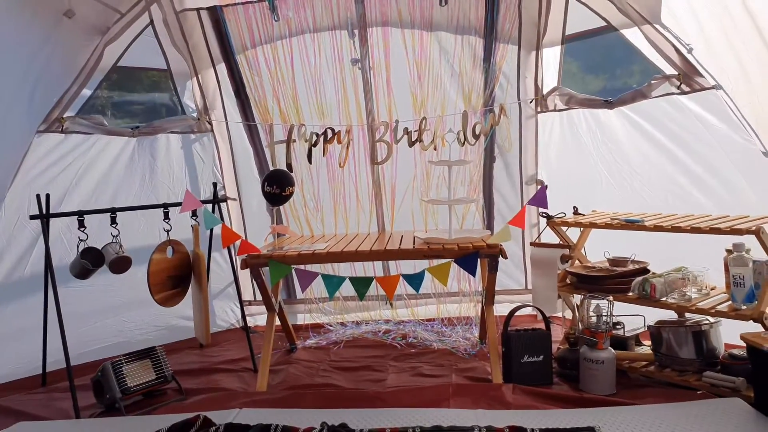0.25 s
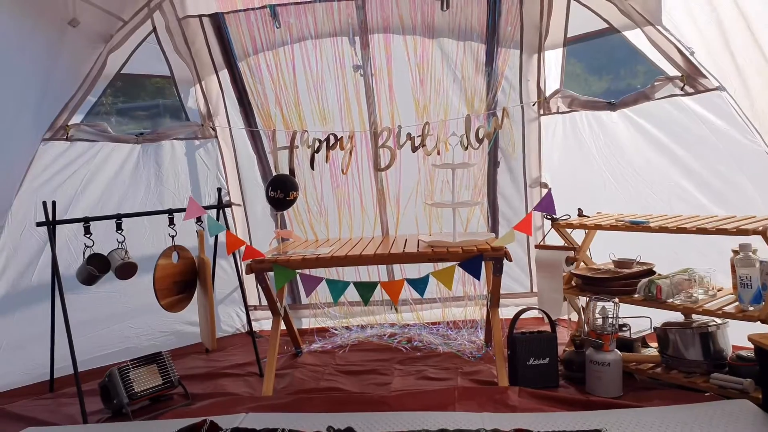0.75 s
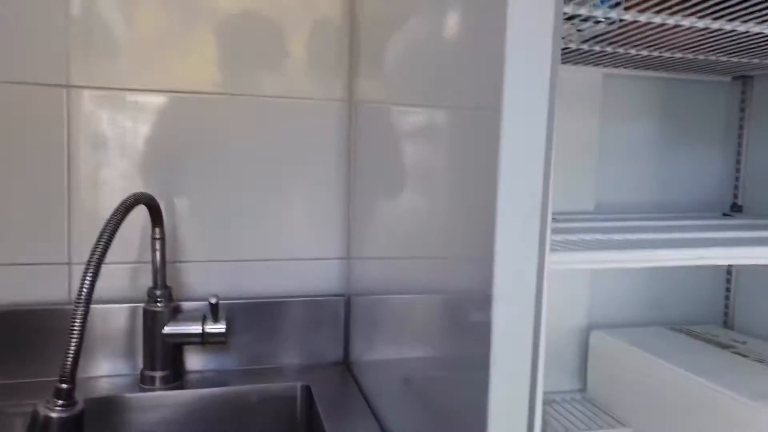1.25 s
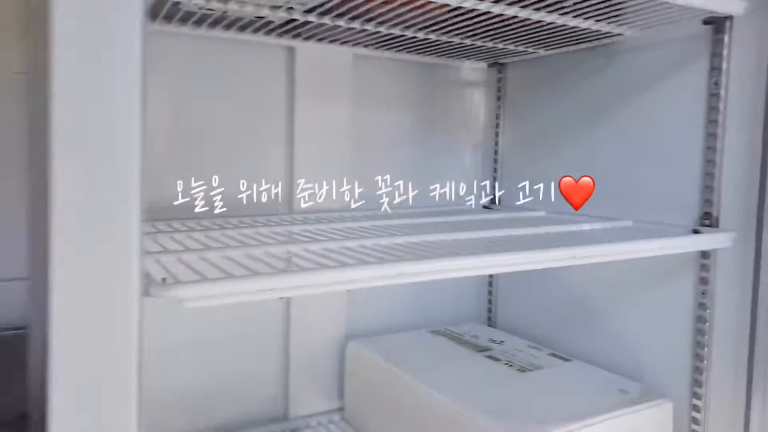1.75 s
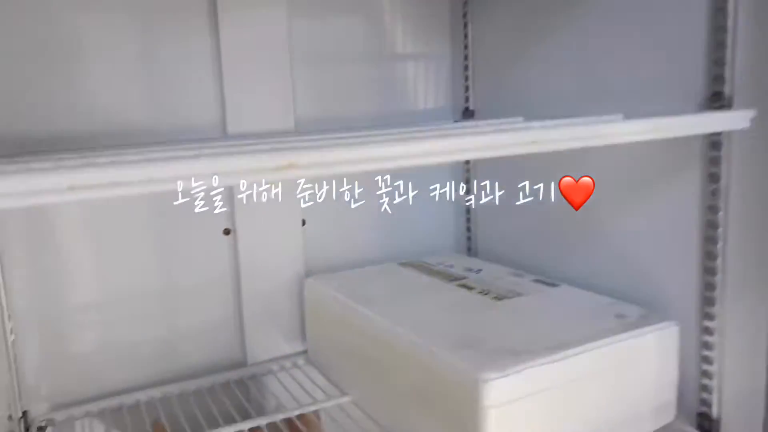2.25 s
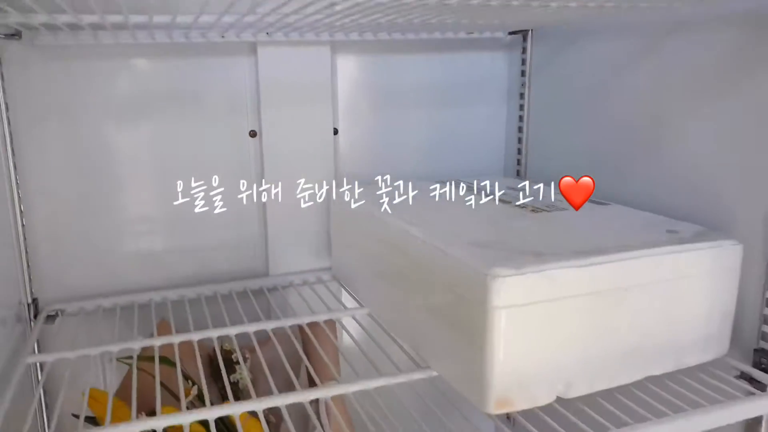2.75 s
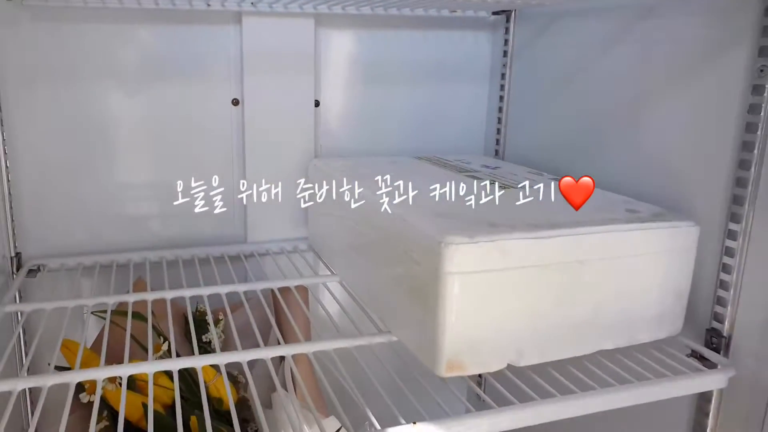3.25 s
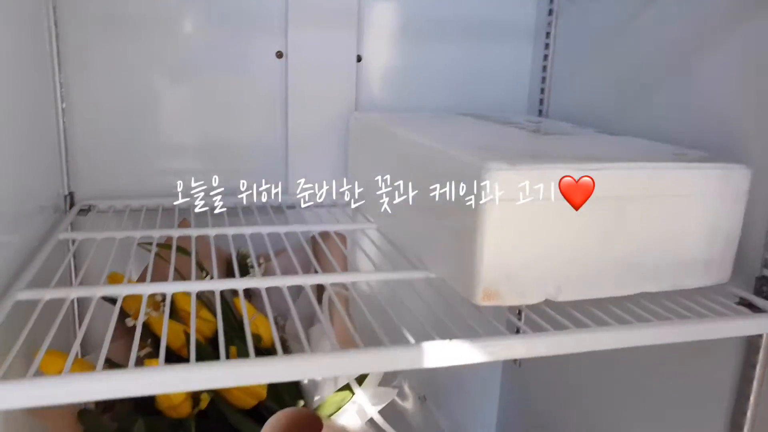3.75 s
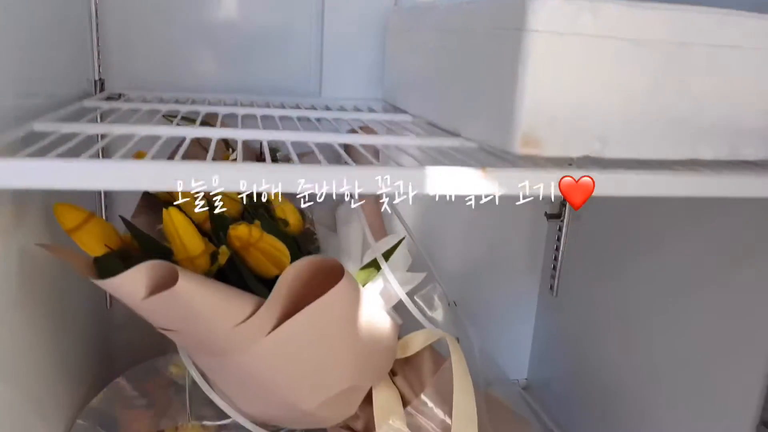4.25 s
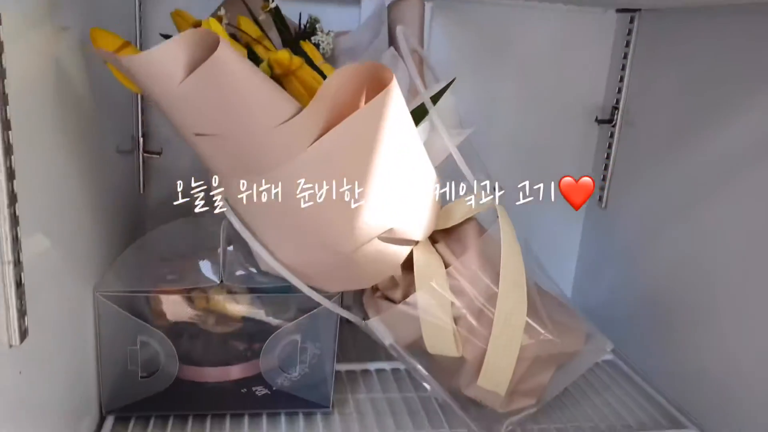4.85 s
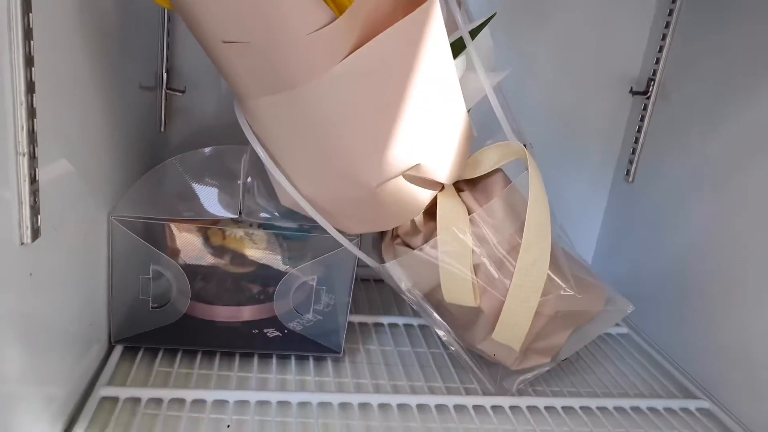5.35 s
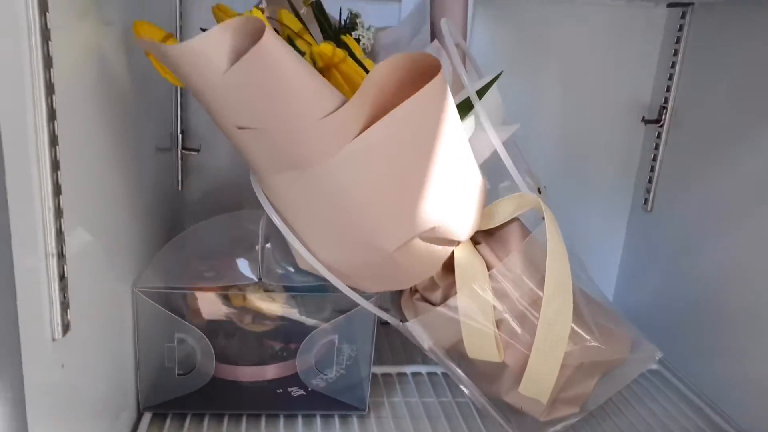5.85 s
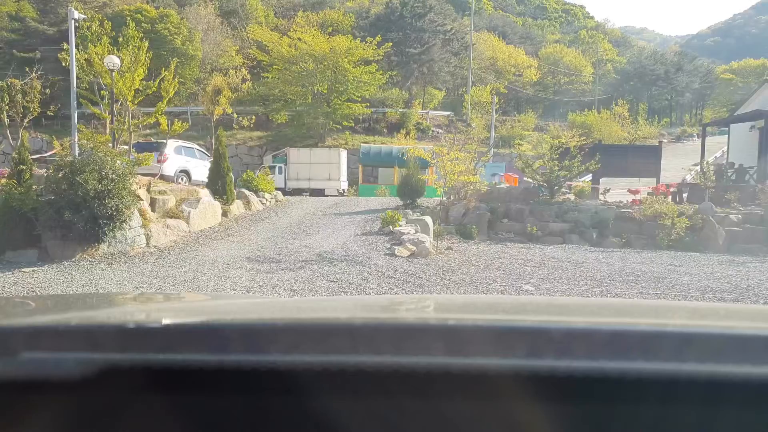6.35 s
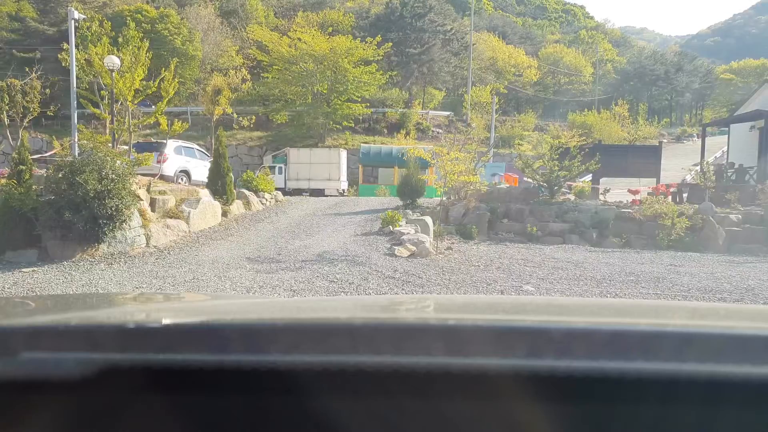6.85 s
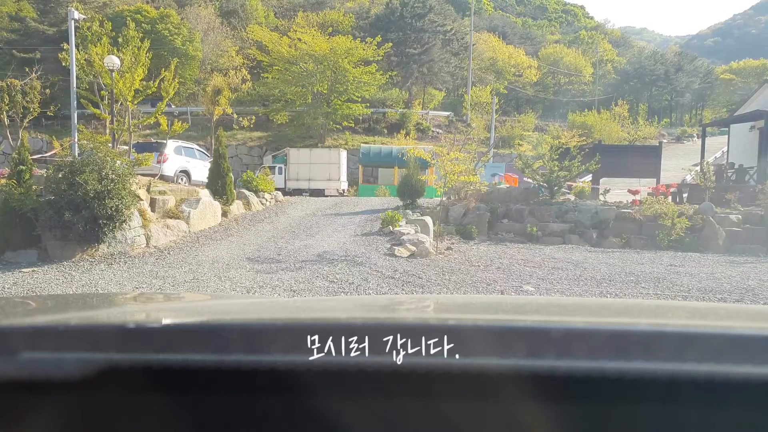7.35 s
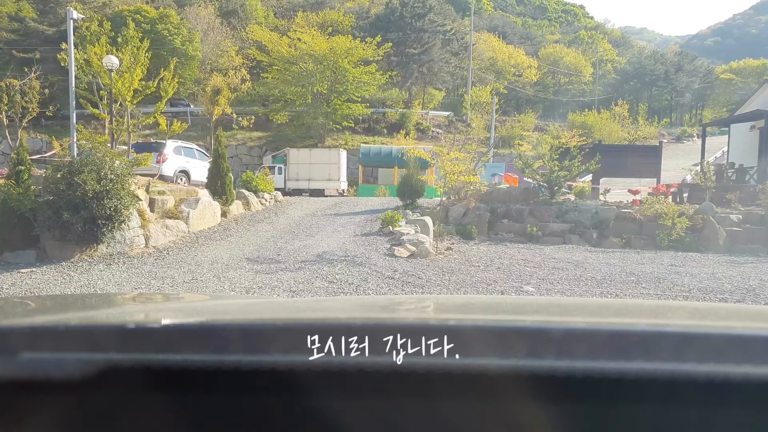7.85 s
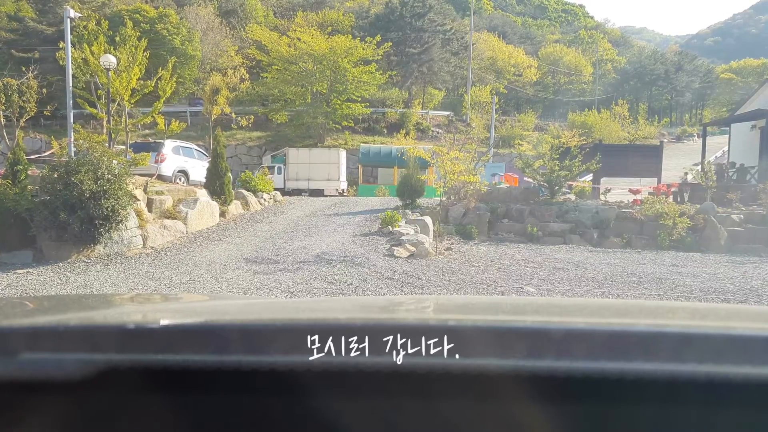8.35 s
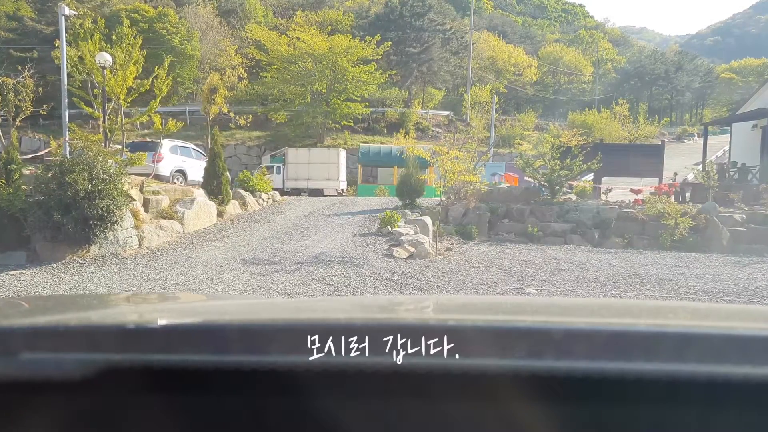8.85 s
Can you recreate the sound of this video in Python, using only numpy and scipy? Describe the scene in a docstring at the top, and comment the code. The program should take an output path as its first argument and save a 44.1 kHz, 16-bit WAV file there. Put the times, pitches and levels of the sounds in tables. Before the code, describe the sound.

From 0 to 1 s, a very quiet tent: faint outdoor air, tiny papery rustles and soft low cloth flaps on the left. At 1.0 s it cuts abruptly to an open commercial refrigerator, growing quickly louder over half a second as the microphone nears, with a brief hollow airy note. Low motor hum beats slowly under fluttering fan tones, booming roar, duct rush and grille hiss; colours shift with movement. Light ticks come near 1.8 and 3.8 s, a thin squeak at 2.7 s; the roar eases slightly after 3 s. At 5.85 s, a dead, padded car cabin: dull double knocks, another heavy cluster at 6.2 s, over low idle and soft clatter. Light taps from 7 s, a sharp latch click at 7.5 s, then the engine revs, peaking around 8.2-8.5 s with taps, and settles by 8.9 s with a low jolt at 8.8 s; abrupt end.

```python
"""A quiet tent comes first: faint outdoor air as shaped noise, with rustles and flaps of the cloth.
Then an open commercial refrigerator: wavering tones hum and beat for its motors and fans,
and noise roars, rushes and hisses through the steel cabinet, with booming standing waves.
Last a car cabin: crank-locked tones and clatter idle, swell and settle; controls thud and click."""
import sys
import numpy as np
from scipy import signal
from scipy.fft import rfft, irfft, next_fast_len
from scipy.io import wavfile
from scipy.ndimage import uniform_filter1d, map_coordinates

SR = 44100
rng = np.random.default_rng(int(sys.argv[2]) if len(sys.argv) > 2 else 0)


def transcribe(u):
    """Save the signal u as a 16-bit wav file named by the first command-line argument.

    u: samples, shape (n,) or (channels, n), limited to [-1, 1]; the rate is SR.
    q: integer samples, one column per channel.
    """
    v = np.clip(np.atleast_2d(u).T, -1, 1)
    q = np.round(v * 32767).astype(np.int16)
    wavfile.write(sys.argv[1], SR, q)


N = 400869
T = np.arange(N) / SR   # seconds

FRIDGE_FROM_S, CAR_FROM_S = 1.024, 5.851


def from_db(db):
    """Decibels to gain."""
    return np.exp(np.asarray(db, dtype=np.float32) * np.float32(np.log(10) / 20))


def rms(x):
    """Root mean square."""
    return np.sqrt(np.mean(x ** 2) + 1e-20)


def in_time(rows):
    """Each column of a curve, sample by sample."""
    s, *columns = np.transpose(rows)
    return [np.interp(T, s, column) for column in columns]


def gain_at(points, hz):
    """Gain of a (Hz, dB) table, joined on a log-frequency axis."""
    known_hz, level_db = np.transpose(points)
    return from_db(np.interp(np.log(hz), np.log(known_hz), level_db))


def drift(rate):
    """Smooth random wander of spread about 1, through `rate` random knots per second."""
    knots = rng.standard_normal(1000)
    coarse_s = T[::50]
    wander = map_coordinates(knots, [coarse_s * rate + 2], mode="wrap")
    return np.interp(T, coarse_s, wander)


def turns(hz):
    """Cycles completed at a changing rate."""
    return np.cumsum(hz) / SR


def tone(cycles):
    """A sine of rms 1 that starts anywhere in its cycle."""
    phase = cycles + rng.random()
    wrapped = phase - np.floor(phase)
    return np.sin(np.float32(2 * np.pi * wrapped)) * 2 ** .5


def narrow_noise(hz, width_hz):
    """Noise ringing in one resonance, of rms about 1: two drifts modulate a cosine and a sine."""
    angle = 2 * np.pi * hz * T
    return (drift(width_hz) * np.cos(angle) + drift(width_hz) * np.sin(angle)) / np.sqrt(2)


def white():
    """Two unrelated noises."""
    return rng.standard_normal((2, N), dtype=np.float32)


def coloured(pair, spectrum, width):
    """Shapes a mid and a side signal and gives left and right; mid rms 1."""
    size = next_fast_len(N, True)
    hz = np.maximum(np.fft.rfftfreq(size, 1 / SR), 1)
    (low_hz, low_db), (top_hz, top_db) = spectrum[0], spectrum[-1]
    # beyond both ends the spectrum falls by 80 dB per decade
    closed = [(low_hz / 10, low_db - 80), *spectrum, (top_hz * 10, top_db - 80)]
    bins = rfft(np.float32(pair), size) * gain_at(closed, hz)
    mid = irfft(bins[0], size)[:N]
    side = irfft(bins[1] * gain_at(width, hz), size)[:N]
    return np.array([mid + side, mid - side]) / rms(mid)


def blows(rows):
    """Envelope of contacts that swell to a peak and die away by 60 dB in their decay time."""
    power = np.zeros(N)
    for s, db, swell_s, decay_s in rows:
        near = slice(max(int((s - .5) * SR), 0), int((s + 1) * SR))
        age = T[near] - s
        swell = np.exp(2 * np.minimum(age, 0) / swell_s)
        decay = from_db(db - 60 * np.maximum(age, 0) / decay_s) ** 2
        power[near] += decay * swell
    return np.sqrt(power)


# Still air in the tent. Each row: frequency in Hz, relative density in dB per Hz.
TENT_AIR = [(15, -41), (25, -6.5), (69, -5.5), (188, -12), (281, -12), (399, -19), (640, -22), (850, -20.5),
            (950, -27), (1150, -25), (1380, -30), (1550, -25), (1900, -32), (2300, -42), (4000, -48),
            (7400, -48), (9000, -44), (15500, -44.5)]
# Stereo width of the tent. Each row: frequency in Hz, side against mid in dB.
TENT_WIDTH = [(60, -13), (240, -13), (950, -1.5), (3770, 2.5), (15000, 1)]
# Soft flaps of the cloth. Each row: peak time in seconds, peak in dB before panning,
# swell in seconds, decay in seconds.
FLAPS = [(.068, -51, 0.013, 0.3), (.385, -56, 0.051, 0.23), (.555, -48.5, 0.031, 0.13),
         (.89, -56.5, 0.024, 0.13)]
# Low colour of the flaps. Each row: frequency in Hz, relative density in dB per Hz.
FLAP_TONE = [(25, -14), (55, 3), (75, 4), (110, -10), (160, -13.5), (400, -40), (2000, -70)]
# Small rustles of the cloth. Each row: peak time in seconds, peak in dB, swell and decay in seconds.
RUSTLES = [(.015, -56, .002, .08), (.05, -59, .02, .3), (.178, -59, .012, .2), (.272, -61, .012, .35),
           (.39, -65, .04, .35)]
# Papery colour of the rustles. Each row: frequency in Hz, relative density in dB per Hz.
RUSTLE_TONE = [(500, 0), (1200, 1), (1650, -5), (2050, 1), (2500, -12), (3200, -12), (5000, -23),
               (9000, -18), (15000, -19)]
TENT_DB = -52


def tent(flap_pan_db=18.5):
    """Faint outdoor air; the cloth rustles, and flaps slowly on the left."""
    air = from_db(TENT_DB) * coloured(white(), TENT_AIR, TENT_WIDTH)
    flaps = blows(FLAPS) * coloured(white(), FLAP_TONE, TENT_WIDTH)
    flaps = flaps * from_db([[flap_pan_db], [-flap_pan_db]])
    rustles = blows(RUSTLES) * coloured(white(), RUSTLE_TONE, TENT_WIDTH)
    return air + flaps + rustles


def since_fridge():
    """Seconds since the refrigerator was reached."""
    return np.maximum(T - FRIDGE_FROM_S, 0)


# the microphone closes in on the open cabinet, then sinks away from the fan towards the bottom shelf
APPROACH_DB, APPROACH_S = 16.5, 0.39   # how much quieter it starts, time constant
SINK_FROM_S, SINK_DB_PER_S = 2.93, 1.06


def nearness():
    """Level at the moving microphone, in dB against the cabinet mouth."""
    approach_db = -APPROACH_DB * np.exp(-since_fridge() / APPROACH_S)
    return approach_db - SINK_DB_PER_S * np.maximum(T - SINK_FROM_S, 0)


# hollow note of the gap between cabinet and wall; it sinks as the gap widens
WALL_GAP_HZ, WALL_GAP_SAG_HZ_PER_S, WALL_GAP_DB = 1166, 100, -47
WALL_GAP_PASSED_S, WALL_GAP_FADE_DB_PER_S = 1.39, 70


def wall_gap(width_hz=190):
    """Air noise rings in the narrow gap and dies once the microphone has passed it."""
    db = WALL_GAP_DB - WALL_GAP_FADE_DB_PER_S * np.clip(T - WALL_GAP_PASSED_S, 0, 1)
    cycles = turns(WALL_GAP_HZ - WALL_GAP_SAG_HZ_PER_S * since_fridge())
    ringing = [drift(width_hz) * tone(cycles) + drift(width_hz) * tone(cycles) for _ in "LR"]
    return from_db(db) * np.array(ringing) / np.sqrt(2)


# A wire shelf squeaks once. Each row: peak time in seconds, peak in dB, swell and decay in seconds.
SHELF_SQUEAK = [(2.678, -44, 0.011, 0.13)]
SQUEAK_HZ = 4800


def shelf_squeak(width_hz=130):
    """A wire shelf slips on its bracket with one short, thin squeak of narrow noise."""
    return blows(SHELF_SQUEAK) * np.array([narrow_noise(SQUEAK_HZ, width_hz) for _ in "LR"])


# Steady hum of the compressor and the panels it shakes.
# Each row: frequency in Hz, rms in dB at the cabinet mouth, wander in Hz.
HUM = [(52.6, -48, 0.05), (58.75, -33.5, 0.054), (117.65, -39, 0.083), (209.7, -40.5, 0.69),
       (242.8, -44, 0.13), (1993, -71, 3)]
# the condenser fan beats against twice the mains frequency
CONDENSER_HZ, CONDENSER_DB, CONDENSER_FOLLOWS = 113.5, -33, 1.1   # share of nearness followed
# the buzz grows on the way down to the motors
MAINS_BUZZ_HZ, MAINS_DB, MAINS_GROWTH_DB_PER_S = 120, -43.5, 1.43   # starting level


def fridge_hum(nearness_db, follow=0.43, wander_hz=0.21):
    """Motors slip a little behind the mains, so their lines beat slowly."""
    lines = sum(from_db(db) * tone(turns(hz + wander * drift(1.257))) for hz, db, wander in HUM)
    condenser_hz = CONDENSER_HZ + wander_hz * drift(0.96)
    condenser = from_db(CONDENSER_DB + CONDENSER_FOLLOWS * nearness_db) * tone(turns(condenser_hz))
    mains_db = MAINS_DB + MAINS_GROWTH_DB_PER_S * since_fridge()
    mains = from_db(mains_db) * tone(MAINS_BUZZ_HZ * T)
    return lines * from_db(follow * nearness_db) + condenser + mains


# Levels of the first three blade tones at the moving microphone, before flutter and panning.
# Each row: time in seconds, first, second and third tone in dB.
FAN_SING = [(1.05, -45, -57, -54.5), (1.8, -36.5, -55, -46.5), (2.4, -43, -53, -43.5),
            (3.4, -37, -51, -39.5), (4.15, -36.5, -38, -38.5), (4.4, -43.5, -55, -47.5),
            (5.3, -35, -50, -38.5), (5.83, -36, -44.5, -41)]


def fan_sing():
    """The cabinet's answer to the third blade tone, in dB against its strongest."""
    sing_db = in_time(FAN_SING)[-1]
    return sing_db - sing_db.max()


# Speed of the evaporator fan. Each row: time in seconds, blade rate in Hz.
FAN_SPEED = [(1.1, 184.2), (1.6, 190.3), (2.2, 192.9), (2.8, 193.8), (3.3, 196), (4.15, 194.9),
             (4.5, 193.9), (5.3, 195.5), (5.85, 194.3)]


def fridge_fan(flutter_db=1.8, jitter_hz=0.373, wander_hz=0.153, pan_db=-1.7):
    """Blade tones at multiples of the blade rate, fluttering in the turbulent inflow."""
    blade_hz, = in_time(FAN_SPEED)
    passes = turns(blade_hz + wander_hz * drift(1.51) + jitter_hz * drift(14))
    lines = 0
    for multiple, db in enumerate(in_time(FAN_SING), 1):
        lines = lines + from_db(db + flutter_db * drift(11)) * tone(multiple * passes)
    return lines * from_db([[pan_db], [-pan_db]])


# Two standing waves of the cabinet air. Each row: frequency in Hz, width in Hz.
CABINET_MODES = [(212, 26), (304, 26)]
# Their levels as the microphone moves through them.
# Each row: time in seconds, lower mode in dB, upper mode in dB.
STANDING_LEVELS = [(1.05, -48, -57), (1.25, -33.5, -36.5), (1.8, -29.5, -47), (2.6, -32.5, -42),
                   (3.25, -29.5, -38.5), (3.8, -35.5, -43.5), (4.55, -36, -31.5), (5.1, -35, -38),
                   (5.83, -36, -32.5)]


def standing_waves():
    """The air stream keeps the cabinet's modes booming; each is louder in some places than in others."""
    modes = zip(CABINET_MODES, in_time(STANDING_LEVELS))
    return sum(from_db(db) * narrow_noise(hz, width_hz) for (hz, width_hz), db in modes)


def steel_walls(pair, echo=0.16, sway_s=.0005, count=6):
    """Short echoes inside the cabinet comb the air noise; the combs slide as the microphone moves."""
    out = pair.copy()
    for lag_s in rng.uniform(.002, .012, count):
        heard_s = T - lag_s - sway_s * drift(1.5)
        delayed = pair.take((heard_s * SR).astype(int), axis=1, mode="wrap")
        out += echo * rng.choice([-1, 1], (2, 1)) * delayed
    return out


# Bands in which the air stream grows lumpy. Each row: low edge in Hz, high edge in Hz.
EDDY_BANDS = [(700, 1300), (1300, 2200), (2200, 3600)]


def eddies(pair, depth=0.14, rate=14):
    """Eddies at the grille make each band of the air noise swell and sink on its own."""
    out = pair.copy()
    for low, high in EDDY_BANDS:
        band_pass = signal.butter(2, [low, high], "band", fs=SR, output="sos")
        out += depth * drift(rate) * signal.sosfilt(band_pass, pair)
    return out


# Low roar in the cabinet. Each row: frequency in Hz, relative density in dB per Hz.
ROAR = [(25, -21), (60, -11), (100, -8), (145, -1.5), (165, -5), (190, -2.5), (230, 0), (265, -3),
        (305, -0.5), (340, -9.5), (385, -9), (440, -21), (540, -23), (800, -39)]
# Rush in the duct. Each row: frequency in Hz, relative density in dB per Hz.
RUSH = [(400, -7.5), (540, -4.5), (580, 1.5), (630, 2.5), (700, -6), (790, -9), (960, -10), (1060, -15.5),
        (1450, -17.5), (2000, -22.5), (3000, -24.5)]
# Hiss at the grille. Each row: frequency in Hz, relative density in dB per Hz.
HISS = [(1300, -52), (1900, 4), (2300, -1.5), (2600, -9), (3300, -2), (3700, -5), (4800, -5.5), (5600, -7),
        (7300, -9.5), (9000, -7), (12000, -6.5), (15500, -11)]
# Stereo width of the refrigerator. Each row: frequency in Hz, side against mid in dB.
FRIDGE_WIDTH = [(60, -3), (200, -23), (300, -13.5), (380, -7.5), (620, -5.5), (800, -8), (1000, 3.5),
                (1300, 4.5), (1750, 2.5), (2200, -3), (3200, -2), (4200, 0.5), (8000, 0)]
# Light ticks of wrapping paper. Each row: peak time in seconds, peak in dB, swell and decay in seconds.
PAPER_TICKS = [(1.781, -44.5, .002, 0.099), (3.808, -48, 0.0022, 0.2)]
# Bright colour of the ticks. Each row: frequency in Hz, relative density in dB per Hz.
PAPER_TONE = [(2000, 5), (3300, 2), (4500, 3), (5500, -12), (12000, -10)]
# air stream: dB at the cabinet mouth, share of the microphone's nearness that it follows
ROAR_DB, ROAR_FOLLOWS = -30.5, 0.53
RUSH_DB, RUSH_FOLLOWS = -38.5, 0.25
RUSH_SINGS = 0.096   # the duct also takes a share of the fan's singing
HISS_DB, HISS_FOLLOWS = -52, 0.24


def fridge(gust_db=0.8, surge_db=1.4, swell_db=0.5):
    """Air roars in the cabinet, rushes in the duct and hisses at the grille, over the motors."""
    near_db = nearness()
    roar_db = ROAR_DB + ROAR_FOLLOWS * near_db + surge_db * drift(9)
    roar = from_db(roar_db) * coloured(white(), ROAR, FRIDGE_WIDTH)
    rush_db = RUSH_DB + RUSH_FOLLOWS * near_db + RUSH_SINGS * fan_sing()
    rush = from_db(rush_db) * coloured(steel_walls(white()), RUSH, FRIDGE_WIDTH)
    hiss_db = HISS_DB + HISS_FOLLOWS * near_db
    hiss = from_db(hiss_db) * coloured(steel_walls(white()), HISS, FRIDGE_WIDTH)
    gusts = from_db(gust_db * drift(40) + swell_db * drift(5.6))
    air = roar + standing_waves() + eddies(rush + hiss) * gusts
    ticks = blows(PAPER_TICKS) * coloured(white(), PAPER_TONE, FRIDGE_WIDTH)
    return air + ticks + shelf_squeak() + wall_gap() + fridge_hum(near_db) + fridge_fan()


# Stereo width of the car cabin. Each row: frequency in Hz, side against mid in dB.
CAR_WIDTH = [(60, -4.5), (130, -9.5), (290, -6), (640, -2), (1410, 6.5), (3100, -4.5), (6820, 2.5),
             (15000, 6)]
# Plastic latch and trim clicks. Each row: peak time in seconds, peak in dB, swell and decay in seconds.
CLICKS = [(7.4915, -39, 0.0005, 0.02), (7.496, -37.5, 0.0011, 0.055), (7.509, -45, .001, 0.043),
          (7.522, -58.5, .003, 0.25), (8.244, -56.5, 0.002, 0.05), (8.256, -64, .003, .3)]
# Colour of the cracks. Each row: frequency in Hz, relative density in dB per Hz.
CLICK_TONE = [(600, -34), (1050, -12.5), (1400, 2.5), (1650, -8), (2080, 5), (2450, -10.5), (3500, -6.5),
              (4800, -16), (5500, -14), (7200, -23.5), (9000, -18), (15500, -23)]
# Ringing of the latch spring. Each row: frequency in Hz, relative level in dB, 60 dB decay in seconds.
LATCH_MODES = [(1950, -7, .08), (2120, -6, .09), (2616, -15.5, 0.38), (3031, -17, 0.23), (3480, -19, 0.18),
               (3720, -16, .16), (4064, -25, .25), (5480, -19, .07)]


def latch(ring_db=-3):
    """Each click is a short crack; the hardest leaves the spring ringing."""
    crack = blows(CLICKS) * coloured(white(), CLICK_TONE, CAR_WIDTH)
    s, db = max(CLICKS, key=lambda row: row[1])[:2]
    start, age = int(s * SR), T[:SR]
    for hz, level_db, t60 in LATCH_MODES:
        decay = np.exp(-np.log(1000) * age / t60)
        ring = from_db(db + ring_db + level_db) * decay * np.sin(2 * np.pi * hz * age)
        crack[:, start:start + SR] += ring * rng.normal(1, .2, (2, 1))
    return crack


# Dull knocks of the gear lever and handbrake. Each row: time in seconds,
# peak in dB before the scuff and ring trims, swell and decay of the scuff in seconds.
THUDS = [(5.859, -27.5, .002, 0.13), (5.892, -22.5, 0.0053, 0.12), (6.043, -35, .0025, 0.082),
         (6.202, -24, 0.015, 0.12), (6.219, -22.5, 0.0046, 0.091), (6.231, -21.5, 0.0027, 0.12),
         (6.27, -30.5, .003, 0.13), (7.5, -40, .02, 0.35)]
# Colour of the scuffs. Each row: frequency in Hz, relative density in dB per Hz.
THUD_TONE = [(30, -10.5), (70, 0), (120, -1), (180, 0.5), (280, 0), (350, -10.5), (430, -9), (560, -22),
             (900, -26.5), (1400, -38), (2100, -39), (2800, -51)]
# What the console and cabin ring with.
# Each row: frequency in Hz, relative level in dB, 60 dB decay in seconds.
THUD_MODES = [(82, -3, .25), (111.5, -3, 0.44), (178, -2, 0.36), (284, -2, 0.15), (420.5, -4, 0.076),
              (816, -23, 0.12), (1170, -28, 0.12)]


def thuds(scuff_db=-1, ring_db=-4, contact_s=0.0034):
    """Each knock is a short scuff and a padded push that leaves the console ringing low."""
    out = from_db(scuff_db) * blows(THUDS) * coloured(white(), THUD_TONE, CAR_WIDTH)
    age = T[:SR]
    push = 1 - np.exp(-(age / contact_s) ** 2)   # padding softens the onset
    for s, db, *_ in THUDS:
        start = int(s * SR)
        for hz, level_db, t60 in THUD_MODES:
            decay = from_db(db + ring_db + level_db - 60 * age / t60)
            ring = push * decay * np.sin(2 * np.pi * hz * age)
            out[:, start:start + SR] += ring * rng.normal(1, 0.33)
    return out


# The engine idles, is revved to move off and settles. Each row: time in seconds, crank turns per second.
ENGINE = [(5.95, 24.2), (6.08, 24.3), (6.26, 25.4), (6.7, 23.9), (6.84, 24.2), (7.5, 24.4), (7.7, 27.3),
          (8.1, 33.3), (8.24, 34.1), (8.48, 33.8), (8.64, 31.7), (8.88, 27), (9.07, 27.3)]
THROTTLE_LEAD_S = 0.17   # the engine answers the pedal late


def engine_load():
    """How far the throttle is open: 0 at idle, 1 at most; it runs ahead of the engine's speed."""
    s, crank_hz = np.transpose(ENGINE)
    return (np.interp(T + THROTTLE_LEAD_S, s, crank_hz) - crank_hz.min()) / np.ptp(crank_hz)


# Tones of the engine. Each row: multiple of the crank rate, rms in dB before the cabin's resonances,
# rise in dB at full load.
ENGINE_ORDERS = [(1, -27, 0.5), (2, -27, 2), (3, -43.5, 5), (4, -45, 3), (5, -46.5, -2), (6, -51.5, 5),
                 (7, -48, 6), (8, -54, 4.5), (9, -51, 1.5), (11, -58.5, 0), (13, -67, 5.5)]
# Resonances of mounts and cabin that the orders sweep through. Each row: frequency in Hz, gain in dB.
CABIN_BOOM = [(24, -17), (27, -11.5), (29, -1.5), (34, 2), (47, -5), (54, -3), (58, -2), (61, -12),
              (64, -4.5), (68, 2), (82, -0.5), (110, 2), (128, -1), (155, -4), (172, 0.5), (200, 2),
              (222, -2), (241, 2.5), (260, 0.5)]
# Clatter as it sounds in the cabin. Each row: frequency in Hz, relative density in dB per Hz.
CLATTER = [(25, -9), (45, -1), (100, -3), (140, -6), (190, -6), (230, -1), (275, 2.5), (340, -8), (400, 2),
           (430, 1), (470, -10), (560, -6), (720, -17.5), (920, -29), (1400, -53)]
CLATTER_DB, CLATTER_LOAD_DB = -41.5, 6   # through the bulkhead: at idle, rise at full load


def engine(order_side_db=-9, uneven_db=2.5, loose=1.12, chug=0.37, throb=0.15):
    """Four cylinders: low orders shake the cabin, valve and injector clatter repeats every two turns."""
    crank_hz, = in_time(ENGINE)
    crank, load = turns(crank_hz), engine_load()
    body = 0
    for order, db, load_db in ENGINE_ORDERS:
        mid = tone(order * crank)
        # above the firing rate each order stands in the cabin with a pattern of its own
        side = (order > 2) * from_db(order_side_db) * tone(order * crank)
        uneven = uneven_db * (1 - 1 / order) * drift(9)
        level = gain_at(CABIN_BOOM, order * crank_hz) * from_db(db + load_db * load + uneven)
        body = body + level * np.array([mid + side, mid - side])
    # one random pattern per channel, read once every two crank turns
    patterns = rng.standard_normal((2, 2048))
    place = crank / 2 % 1
    repeating = np.array([np.interp(place, np.linspace(0, 1, len(p)), p) for p in patterns])
    strokes = 1 + chug * np.cos(2 * np.pi * crank) + throb * np.cos(4 * np.pi * crank)
    clatter = coloured((repeating + loose * white()) * strokes, CLATTER, CAR_WIDTH)
    return body + from_db(CLATTER_DB + CLATTER_LOAD_DB * load) * clatter


# Airy rush of intake and tyres. Each row: frequency in Hz, relative density in dB per Hz.
INTAKE = [(700, -5.5), (1000, -1), (1450, 3.5), (1900, -7), (2110, -6.5), (2330, -20.5), (3200, -24),
          (3900, -19), (4500, -23.5)]
INTAKE_DB, INTAKE_LOAD_DB = -75, 13.5   # at idle, rise at full load
# Soft airy brushes; the first is the tail of the refrigerator's hiss dying away.
# Each row: peak time in seconds, peak in dB, swell and decay in seconds.
BRUSHES = [(5.915, -57, 0.2, 0.31), (6.05, -68.5, 0.0086, 0.71), (6.14, -70.5, 0.039, 0.93),
           (6.23, -65.5, 0.052, 0.2)]
# Airy colour of the brushes. Each row: frequency in Hz, relative density in dB per Hz.
BRUSH_TONE = [(700, -5.5), (1600, -1), (3000, -6), (6000, -5), (11000, -2), (15500, -7)]
# Faint hiss in the cabin. Each row: frequency in Hz, relative density in dB per Hz.
CAR_HISS = [(1000, 0), (2500, 0), (4000, -1), (7400, -3.5), (9000, 0), (15500, 2)]
CAR_HISS_DB = -81
# Light taps of loose trim as the car shakes and rolls.
# Each row: peak time in seconds, peak in dB, swell and decay in seconds.
TAPS = [(6.952, -53, .002, .06), (7.153, -48, .001, .05), (7.28, -52, .002, .06), (7.445, -49, .001, .06),
        (8.252, -44, .002, .1), (8.594, -39, .004, .1), (8.78, -46, .004, .08)]
# Dull body of the taps. Each row: frequency in Hz, relative density in dB per Hz.
TAP_TONE = [(250, -8), (480, 3), (620, 0), (900, -16), (1450, -27), (2100, -42), (2600, -52)]
# The body rocks as the wheels roll over ruts.
# Each row: peak time in seconds, peak in dB, swell and decay in seconds.
JOLTS = [(6.8, -42, .04, .3), (8.82, -32, .04, .3)]
# Low colour of the jolts. Each row: frequency in Hz, relative density in dB per Hz.
JOLT_TONE = [(30, -5.5), (55, -2), (85, 4), (110, -2.5), (160, -13.5), (300, -25)]


def car():
    """The engine, knocks, clicks and soft airy brushes in a dead, padded cabin."""
    hiss = from_db(CAR_HISS_DB) * coloured(white(), CAR_HISS, CAR_WIDTH)
    intake_db = INTAKE_DB + INTAKE_LOAD_DB * engine_load()
    intake = from_db(intake_db) * coloured(white(), INTAKE, CAR_WIDTH)
    brushes = blows(BRUSHES) * coloured(white(), BRUSH_TONE, CAR_WIDTH)
    taps = blows(TAPS) * coloured(white(), TAP_TONE, CAR_WIDTH)
    jolts = blows(JOLTS) * coloured(white(), JOLT_TONE, CAR_WIDTH)
    return hiss + intake + brushes + taps + jolts + latch() + thuds() + engine()


FADE_OUT_S = .008


def scene():
    """One place gives way to the next at once; the last fades out quickly."""
    # a 64-sample ramp softens each change
    past_tent, in_car = (uniform_filter1d((T > s) * 1., size=64) for s in (FRIDGE_FROM_S, CAR_FROM_S))
    fade = np.minimum((T[-1] - T) / FADE_OUT_S, 1)
    return (1 - past_tent) * tent() + (past_tent - in_car) * fridge() + in_car * fade * car()


CUTOFF_HZ = 15800


def record(dry):
    """A steep elliptic low-pass cuts the top."""
    low_pass = signal.ellip(12, .1, 90, CUTOFF_HZ, fs=SR, output="sos")
    return signal.sosfilt(low_pass, dry)


dry = scene()
out = record(dry)
transcribe(out)
```